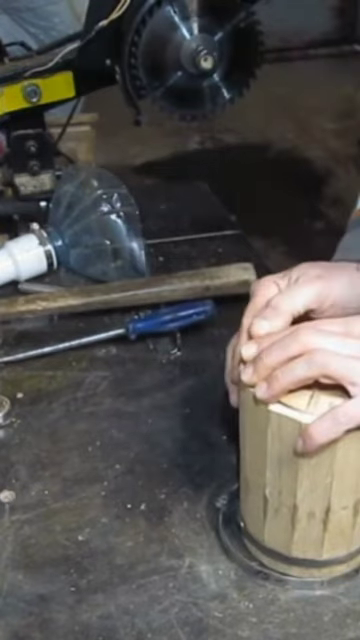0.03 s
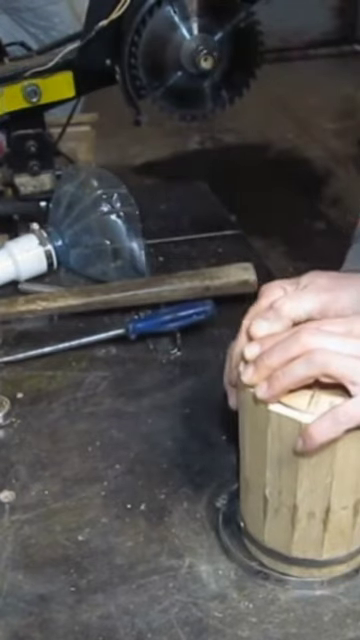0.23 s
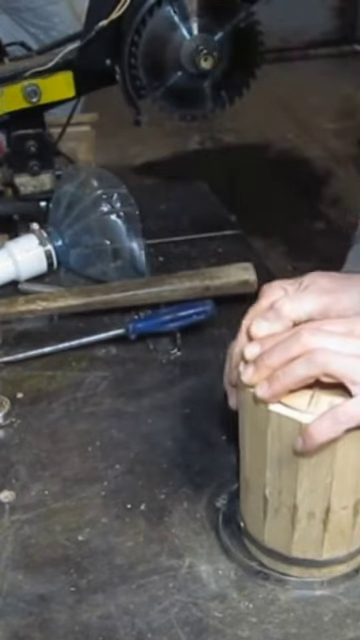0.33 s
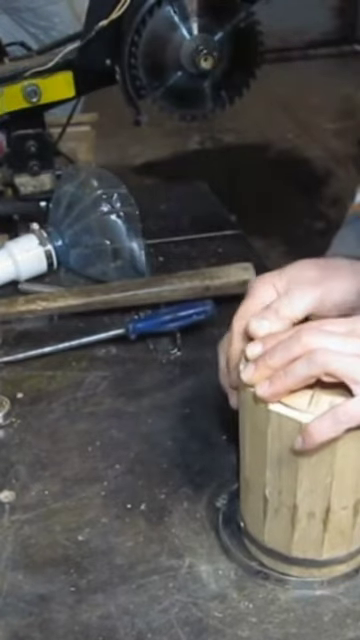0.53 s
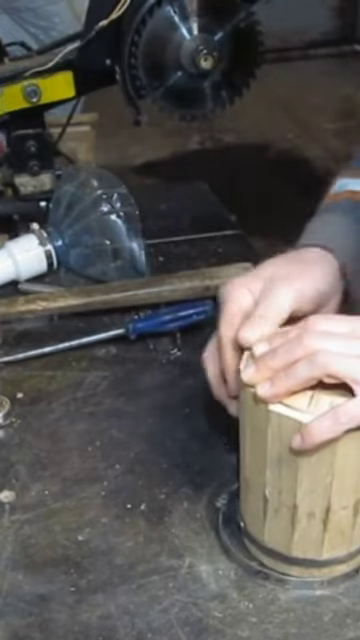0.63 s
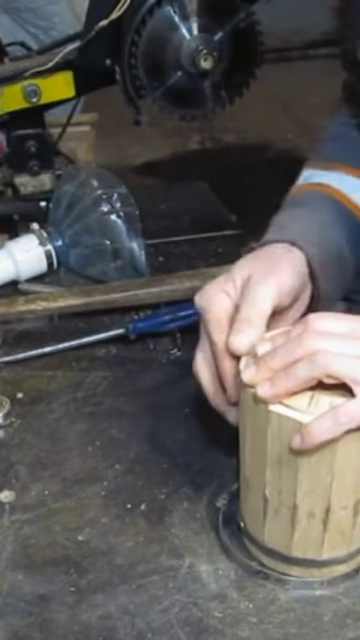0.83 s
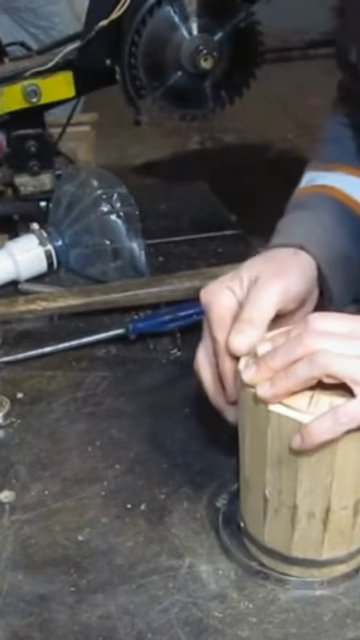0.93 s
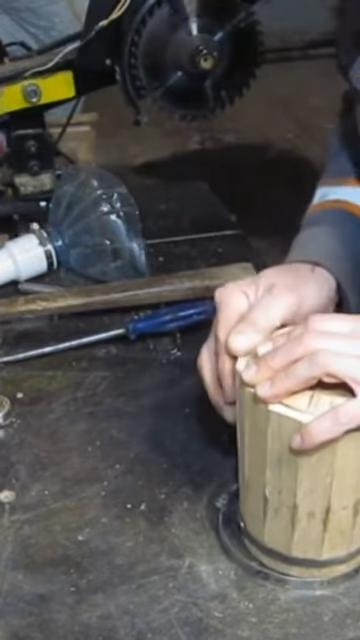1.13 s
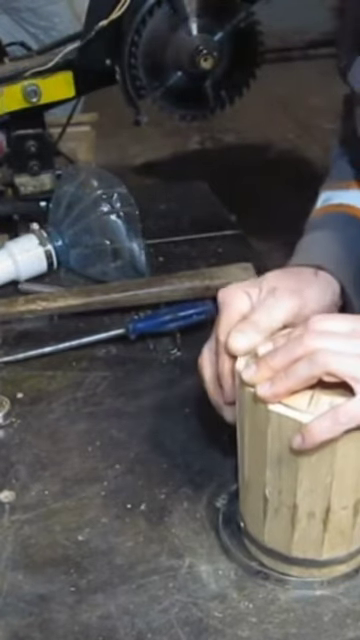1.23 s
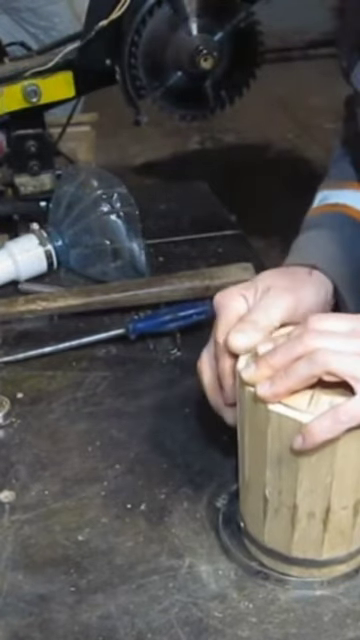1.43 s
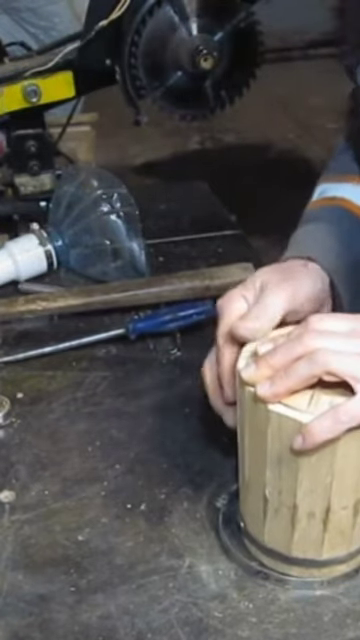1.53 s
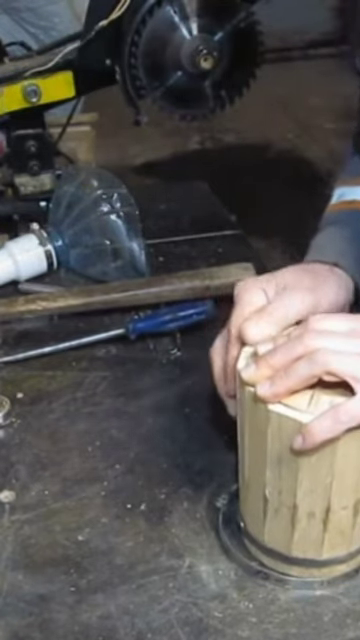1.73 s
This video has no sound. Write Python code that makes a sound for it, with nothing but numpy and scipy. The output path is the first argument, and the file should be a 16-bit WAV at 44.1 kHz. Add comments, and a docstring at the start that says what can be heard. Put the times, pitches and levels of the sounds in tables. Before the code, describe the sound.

A wooden mug knocks once hard on a workbench, with small taps and faint rubbing around it

```python
"""In a quiet workshop, hands press a wooden lid onto an upturned wooden mug on a workbench.
The mug rocks and knocks once hard on the bench, with lighter taps and clicks around it: damped thuds,
decaying modes of the wood and short noise bursts. Between them fingers and wood rub over the staves,
as swelling friction noise, resonant hum and faint squeaks. A small room answers the knocks and taps
with a diffuse noise tail, over a faint steady hiss and whir of shaped noise."""
import sys
import numpy as np
from scipy import signal
from scipy.fft import rfft, irfft
from scipy.io import wavfile

SR = 44100
rng = np.random.default_rng(int(sys.argv[2]) if len(sys.argv) > 2 else 0)


def wrap_up_sound(samples):
    """Save the sound to the file named by the first command line argument, as 16-bit audio."""
    columns = np.atleast_2d(samples).T
    # keep every value between -1 and 1, then stretch to whole-number steps
    tamed = np.clip(columns, -1, 1)
    steps = np.round(tamed * 32767).astype(np.int16)
    wavfile.write(sys.argv[1], SR, steps)


N = 79380

# Likeness is the left-right correlation (0 to 1); every pan is left minus right.

# Steady room noise. Each row: frequency in Hz, relative density in dB per Hz.
AIR_SPECTRUM = [(10, -36), (30, -9), (110, -10), (200, -9.5), (400, -9.5), (720, -8.5), (850, -11.5),
                (1170, -9.5), (1300, -9), (2050, -17), (2450, -17), (3000, -18.5), (5000, -23.5),
                (11500, -34), (15000, -47)]
# Stereo spread of the room noise. Each row: frequency in Hz, left-right likeness.
AIR_LIKENESS = [(40, 0.52), (250, 0.41), (1000, 0.49), (3000, 0.15), (10000, 0.038)]
AIR_DB, AIR_PAN_DB = -57, -2
# A faint steady whir; the width is that of each of two resonances in series.
WHIR_HZ, WHIR_WIDTH_HZ, WHIR_DB, WHIR_LIKENESS = 990, 135, -62.3, 0.55

# Rubbing strokes. Each row: start in seconds, rise in seconds, fall in seconds, hiss level in dB,
# level of the wood's hum in dB, level of the low rumble in dB.
RUB_STROKES = [(-0.02, 0.012, 0.088, -57.5, -55, -56.5), (0.124, 0.0073, 0.22, -62.5, -56, -51),
               (0.431, 0.029, 0.13, -61, -63.5, -64), (0.512, 0.0062, 0.099, -51.5, -53.5, -55.5),
               (0.563, 0.1, 0.083, -48.5, -52, -55), (0.98, 0.047, 0.15, -63.5, -62.5, -62),
               (1.39, 0.1, 0.14, -61.5, -61, -89), (1.494, 0.034, 0.068, -49.5, -58, -65),
               (1.558, 0.024, 0.028, -59, -52, -69), (1.585, 0.017, 0.04, -54, -54.5, -64),
               (1.629, 0.064, 0.1, -62, -60, -77), (1.733, 0.02, 0.072, -81, -53.5, -60)]
# Hiss of skin on wood. Each row: frequency in Hz, relative density in dB per Hz.
RUB_HISS = [(120, -25), (400, 3.5), (1200, 9), (1900, 10), (3200, 8), (4300, 2), (5500, -2), (6700, 1),
            (8000, -11), (10000, -6.5), (15000, -49)]
# Resonances of the rubbed wood. Each row: frequency in Hz, width in Hz, relative level in dB.
RUB_HUM = [(591, 45, 8.5), (676, 110, 10), (1660, 41, -12.5), (3040, 100, -38), (3860, 75, -25)]
# The skin catches and sings faintly within a stroke. Each row: start in seconds, rise in seconds,
# fall in seconds, pitch in Hz, level in dB.
SQUEAKS = [(0.522, .015, 0.034, 4200, -60), (0.628, .035, 0.066, 4050, -60.5),
           (1.505, 0.016, 0.036, 3140, -55), (1.562, 0.017, 0.042, 679, -52.5),
           (1.585, 0.014, 0.013, 6460, -64.5)]
SQUEAK_Q = 16  # of each of two resonances in series
GRAINS_PER_S, GRAIN_SHARE = 700, 0.33  # mean rate of tiny slips; their weight against smooth noise
JUDDER_HZ, JUDDER_DB = 70, 1.5  # the fingers slip unevenly: top rate and rms swing
RUMBLE_LOW_HZ, RUMBLE_TOP_HZ = 138, 443
RUB_LIKENESS, RUB_PAN_DB = 0.28, -1

# Knocks. Each row: start in seconds, thud level in dB, thud pitch in Hz, ring level in dB,
# contact brightness in Hz, muting by the hands in dB/s, crack level in dB, crack centre in Hz,
# crack t60 in seconds, tick level in dB.
KNOCKS = [(0.1184, -28, 422, -36.5, 3070, 701, -39, 2560, 0.038, -44),
          (0.1997, -33.5, 617, -45, 2500, 297, -36, 2190, 0.047, -49),
          (0.2059, -9, 470, -22.5, 4180, 28, -20, 1760, 0.018, -32.5),
          (0.2279, -32, 330, -46, 1500, 300, -40, 1730, 0.058, -63),
          (0.2462, -22.5, 610, -48, 2500, 300, -47, 1800, 0.049, -59),
          (0.3612, -50, 480, -45, 1200, 150, -37, 3100, 0.025, -60),
          (0.517, -48, 192, -45, 4170, 719, -42.5, 1900, 0.053, -45),
          (0.5203, -28, 423, -54, 800, 401.5, -53, 5940, 0.019, -68),
          (0.533, -43, 192, -66, 1210, 400, -46, 3820, 0.014, -61),
          (0.5468, -40.5, 194, -59, 1220, 400, -51, 2210, 0.027, -69),
          (0.8280, -41.5, 458, -47.5, 404, 504, -71, 2000, 0.025, -70),
          (0.9825, -57, 474, -59, 3000, 500, -48, 2230, 0.046, -62),
          (1.027, -48.5, 384, -47, 433, 100, -50, 1870, 0.014, -75),
          (1.0450, -48.5, 420, -63, 446, 194, -72, 2030, .03, -67),
          (1.073, -48, 310, -52, 500, 200, -70, 1990, 0.024, -71),
          (1.091, -47, 410, -54, 500, 300, -60, 2040, .03, -59),
          (1.235, -52, 402, -62, 510, 328, -73, 2000, 0.04, -69),
          (1.3885, -44, 510, -56, 497, 300, -56.5, 5600, 0.066, -47),
          (1.3943, -38, 374, -54.5, 1500, 248, -51.5, 1090, 0.17, -53)]
# Modes of mug and bench. Each row: frequency in Hz, relative level in dB, t60 in seconds, pan in dB.
MODES = [(270, -14, 0.07, -2), (315, -10, 0.14, -3), (374, -9, 0.12, -1), (407, -2, 0.085, -1),
         (486, -14, 0.17, -2), (577, 2.5, 0.105, -4), (657, 1, 0.11, 0), (771, 0, 0.115, 4),
         (862, -6, 0.13, -6), (900, 2, 0.065, -11), (976, -8, 0.11, -2), (1110, 1, 0.065, 2),
         (1175, -2, 0.019, -5), (1545, -9, 0.05, -9), (1694, -10, 0.055, 1), (1765, -9, 0.065, -9),
         (1885, -6, 0.035, -10), (2255, -17, 0.04, -8), (2725, -8.5, 0.03, -1), (3110, -7, 0.028, -8),
         (3790, -9, .03, -4)]
THUD_CYCLES = 0.48  # cycles to the peak of the thud's envelope, for a contact at HARD_CONTACT_HZ
HARD_CONTACT_HZ, THUD_SOFTENING = 3950, 0.3  # softer contacts swell and fade more slowly
RING_RISE_S = 0.0011  # the ring spreads through mug and bench
RING_SPREAD = 0.29  # phase scale: each mode radiates a little differently to the two sides
CRACK_SPAN = 1.27  # ratio of each band edge to the centre
TICK_LOW_HZ, TICK_TOP_HZ, TICK_T60_S = 1920, 5460, 0.03
BURST_RISE_S, BURST_LIKENESS = 0.0013, 0.27
THUD_PAN_DB, CRACK_PAN_DB = -1.5, -2
KNOCK_BASS_CUT_HZ = 278

# Diffuse tail of the room. Each row: frequency in Hz, level in dB, t60 in seconds, left-right likeness.
ROOM = [(95, 6.5, 0.84, 1), (293, -13.5, 0.32, 0.94), (760, -7.5, 0.27, 0.82), (1460, -4, 0.35, 0.43),
        (3530, -15, 0.37, 0.38), (10200, -6.5, 0.11, 0.4)]
ROOM_DELAY_S, ROOM_BUILD_S = 0.0027, 0.0025

# The lid shifts in its seat. Each row: start in seconds, body level in dB, body centre in Hz,
# click level in dB, click centre in Hz.
LID_TAPS = [(0.5167, -41, 190, -44, 4300), (0.8300, -44.5, 193, -75, 1990), (0.9818, -46, 520, -43.5, 2700),
            (1.3887, -44, 466, -55, 2030), (1.3946, -46, 430, -65, 1810)]
# Modes of the hand-held lid. Each row: frequency in Hz, relative level in dB, t60 in seconds.
LID_MODES = [(194, 0, .07), (328, 2, .11), (412, 0, .06), (572, 1, .08), (1940, -2, .05), (2880, 0, .026),
             (4050, -2, .03)]
LID_FOCUS_DB = 33  # loss one octave from a tap's centre, growing as octaves squared
LID_PAN_DB, LID_BASS_CUT_HZ = -3, 133

CUTOFF_HZ = 15150


def from_db(db):
    """The decibel law: amplitude gain from level."""
    return 10 ** (np.asarray(db) / 20)


def rms_one(x):
    """Power normalisation: scale to unit rms."""
    return x / np.sqrt(np.mean(x ** 2) + 1e-20)


def at_hz(points, hz, axis=1):
    """Logarithmic pitch: interpolate a table column linearly in log frequency."""
    points = np.array(points)
    return np.interp(np.log(hz + 1e-9), np.log(points[:, 0]), points[:, axis])


def pan(db):
    """Level difference: opposite half-steps for left and right gain."""
    return from_db(np.array([[db], [-db]]) / 2)


def butter(x, hz, kind, order=2):
    """Maximally flat filtering: a causal Butterworth response."""
    sos = signal.butter(order, np.clip(hz, 10, 0.45 * SR), kind, fs=SR, output="sos")
    return signal.sosfilt(sos, x + 1e-18)


def stereo(pair, alike):
    """Correlation: mix two unrelated signals as sum and difference for a given likeness."""
    alike = np.clip(alike, -1, 1)
    common = np.sqrt(1 + alike) * pair[0]
    opposed = np.sqrt(1 - alike) * pair[1] * np.array([[1], [-1]])
    return (common + opposed) / np.sqrt(2)


def colour(pair, spectrum, likeness):
    """Spectral shaping: weight the Fourier components of two noises; unit rms."""
    hz = np.arange(N // 2 + 1) * SR / N
    shaped = stereo(rfft(pair), likeness(hz)) * from_db(at_hz(spectrum, hz))
    return rms_one(irfft(shaped, N))


def resonate(x, hz, width_hz):
    """Resonance: a damped pole pair driven by the input; unit rms."""
    radius = np.exp(-np.pi * width_hz / SR)
    poles = [1, -2 * radius * np.cos(2 * np.pi * hz / SR), radius * radius]
    return rms_one(signal.lfilter([1, 0, -1], poles, x))


def swell(s, rise, fall):
    """Amplitude envelope: a smooth sine-squared rise and fall."""
    ramp = np.interp(np.arange(N) / SR, [s, s + rise, s + rise + fall], [0, 1, 0])
    return np.sin(np.pi / 2 * ramp) ** 2


def add(out, s, sound):
    """Superposition: sum a sound into the mix at a time."""
    start = max(int(s * SR), 0)
    out[:, start:start + sound.shape[-1]] += sound[:, :N - start]


def air():
    """Stationary noise: a shaped broadband hiss with a narrow resonant whir in it."""
    hiss = colour(rng.standard_normal((2, N)), AIR_SPECTRUM, lambda hz: at_hz(AIR_LIKENESS, hz))
    whir = stereo(rng.standard_normal((2, N)), WHIR_LIKENESS)
    for _ in range(2):
        whir = resonate(whir, WHIR_HZ, WHIR_WIDTH_HZ)
    return (from_db(AIR_DB) * hiss + from_db(WHIR_DB) * whir) * pan(AIR_PAN_DB)


def rubs():
    """Friction excitation: tiny slips hiss on the grain, make the wood hum and the bench rumble."""
    slips = (rng.random((2, N)) < GRAINS_PER_S / SR) * rng.standard_normal((2, N))
    judder = from_db(JUDDER_DB * rms_one(butter(rng.standard_normal(N), JUDDER_HZ, "low")))
    smooth = rng.standard_normal((2, N))
    friction = (smooth * (1 - GRAIN_SHARE) + rms_one(slips) * GRAIN_SHARE) * judder

    hiss = colour(friction, RUB_HISS, lambda hz: RUB_LIKENESS)
    push = stereo(friction, 1.0)  # the same drive on both sides
    hum = rms_one(sum(from_db(db) * resonate(push, hz, width) for hz, width, db in RUB_HUM))
    rumble = rms_one(butter(push, [RUMBLE_LOW_HZ, RUMBLE_TOP_HZ], "band"))

    out = np.zeros((2, N))
    for s, rise, fall, hiss_db, hum_db, rumble_db in RUB_STROKES:
        stroke = from_db(hiss_db) * hiss + from_db(hum_db) * hum + from_db(rumble_db) * rumble
        out += swell(s, rise, fall) * stroke
    return (out + squeaks(friction)) * pan(RUB_PAN_DB)


def squeaks(friction):
    """Selective resonance: narrow filters draw brief singing tones from the friction noise."""
    out = np.zeros((2, N))
    for s, rise, fall, hz, db in SQUEAKS:
        squeak = stereo(friction, RUB_LIKENESS)
        for _ in range(2):
            squeak = resonate(squeak, hz, hz / SQUEAK_Q)
        out += swell(s, rise, fall) * from_db(db) * squeak
    return out


def wood_modes(t):
    """Modal superposition: mug and bench ring as a sum of exponentially decaying sines."""
    wood = np.zeros((2, len(t)))
    side = np.array([[-1], [1]])
    for k, (hz, db, t60, pan_db) in enumerate(MODES):
        # opposite phase shifts left and right, alternating from mode to mode
        phase = side * RING_SPREAD * (-1) ** k * min(hz / 1000, 1.2) ** 2
        wood -= pan(pan_db) * from_db(db - 60 * t / t60) * np.sin(2 * np.pi * hz * t + phase)
    return wood


def burst(t, db, low_hz, high_hz, t60):
    """High modal density: many close, quickly damped modes act as a band of dying noise."""
    high_hz = max(high_hz, low_hz * 1.1)
    envelope = from_db(db - 60 * t / t60) * (1 - np.exp(-t / BURST_RISE_S))
    noise = stereo(rng.standard_normal((2, len(t))), BURST_LIKENESS) * envelope
    band_gain = np.sqrt(SR / 2 / (high_hz - low_hz))  # makes up for the power outside the band
    return butter(noise, [low_hz, high_hz], "band") * band_gain


def knocks():
    """Impact excitation: a contact thuds, cracks, ticks and rings the wood, which the hands mute."""
    out, t = np.zeros((2, N)), np.arange(SR // 2) / SR
    wood = wood_modes(t)
    for (s, thud_db, thud_hz, ring_db, contact_hz, muting,
         crack_db, crack_hz, crack_t60, tick_db) in KNOCKS:
        # time in units of the thud's rise to its peak
        age = t * thud_hz / THUD_CYCLES * (contact_hz / HARD_CONTACT_HZ) ** THUD_SOFTENING
        thud = -from_db(thud_db) * age * np.exp(1 - age) * np.sin(2 * np.pi * thud_hz * t)
        ring_envelope = from_db(ring_db - max(muting, 0) * t) * (1 - np.exp(-t / RING_RISE_S))
        ring = ring_envelope * butter(wood, contact_hz, "low")
        crack = burst(t, crack_db, crack_hz / CRACK_SPAN, crack_hz * CRACK_SPAN, crack_t60)
        tick = burst(t, tick_db, TICK_LOW_HZ, TICK_TOP_HZ, TICK_T60_S)
        add(out, s, thud * pan(THUD_PAN_DB) + ring + crack * pan(CRACK_PAN_DB) + tick)
    return butter(out, KNOCK_BASS_CUT_HZ, "high")


def workshop(x):
    """Reverberation: convolve with a diffuse tail that dies at its own rate in each octave."""
    t = np.arange(SR // 2) / SR
    tail = np.zeros((2, len(t)))
    onset = np.clip((t - ROOM_DELAY_S) / ROOM_BUILD_S, 0, 1)
    edges = 60 * 2.0 ** np.arange(9)
    for low, high in zip(edges, edges[1:]):
        db, t60, alike = (at_hz(ROOM, np.sqrt(low * high), axis=k) for k in range(1, 4))
        noise = stereo(rng.standard_normal((2, len(t))), alike) * onset
        decaying = butter(noise * from_db(db - 60 * t / t60), [low, high], "band")
        tail += decaying * np.sqrt(2 * np.log(1000) / (t60 * SR))  # offsets the energy of a longer decay
    return signal.fftconvolve(x, tail, axes=1)[:, :N]


def lid():
    """Selective modal excitation: a tap rings modes near two pitches, a hollow body and a dry click."""
    out, t = np.zeros((2, N)), np.arange(SR // 4) / SR
    for s, body_db, body_hz, click_db, click_hz in LID_TAPS:
        for hz, db, t60 in LID_MODES:
            body = from_db(body_db - LID_FOCUS_DB * np.log2(hz / body_hz) ** 2)
            click = from_db(click_db - LID_FOCUS_DB * np.log2(hz / click_hz) ** 2)
            mode = from_db(db - 60 * t / t60) * np.sin(2 * np.pi * hz * t)
            add(out, s, -(body + click) * mode * pan(LID_PAN_DB))
    return butter(out, LID_BASS_CUT_HZ, "high")


def scene():
    """Superposition: knocks and lid taps with their room tail, the rubbing and the room noise."""
    hits = knocks() + lid()
    return hits + workshop(hits) + rubs() + air()


def record(dry):
    """Band limiting: a steep elliptic low-pass cuts the top."""
    return signal.sosfilt(signal.ellip(12, 0.1, 80, CUTOFF_HZ, fs=SR, output="sos"), dry)


dry = scene()
out = record(dry)
wrap_up_sound(out)
```